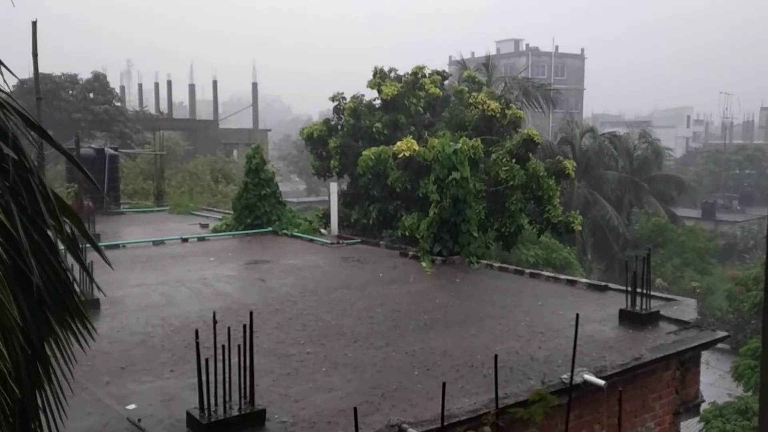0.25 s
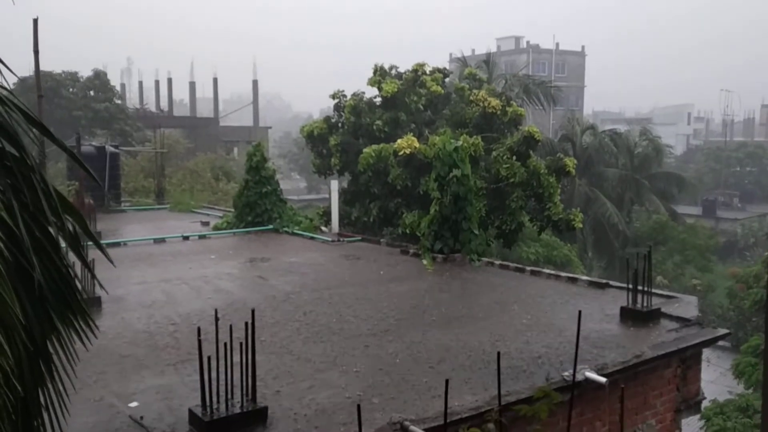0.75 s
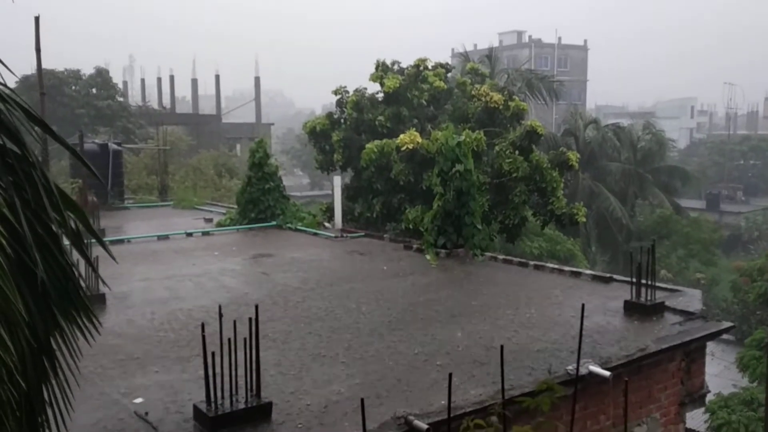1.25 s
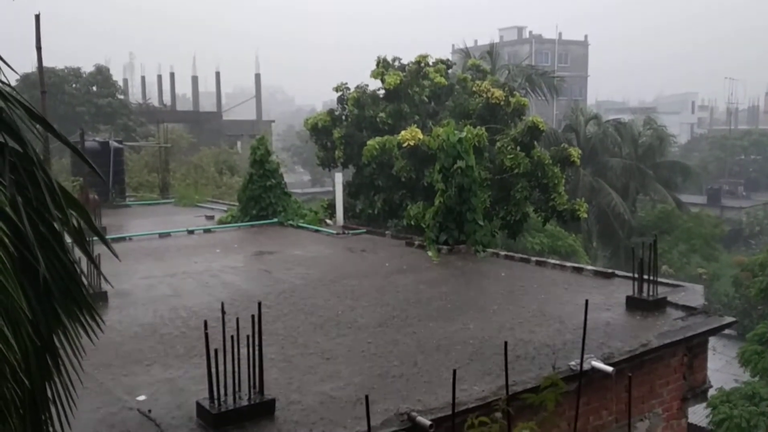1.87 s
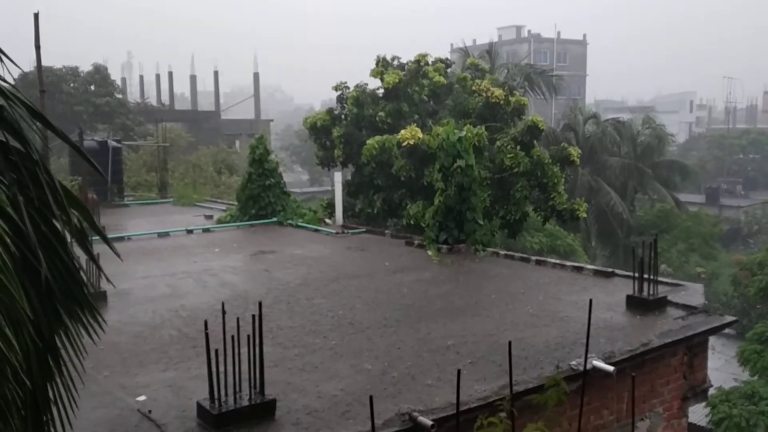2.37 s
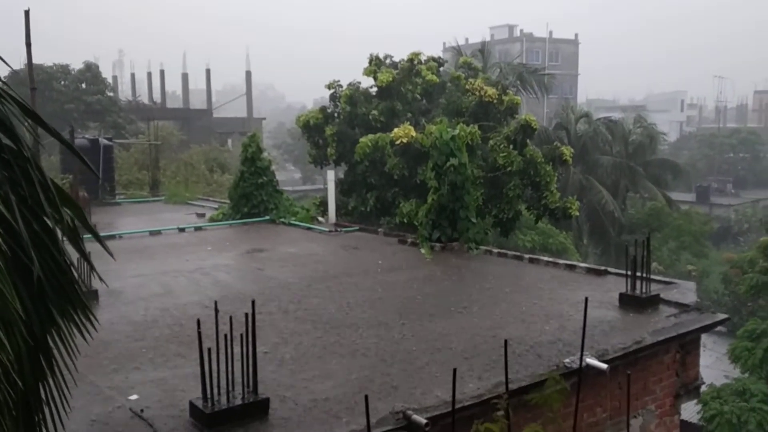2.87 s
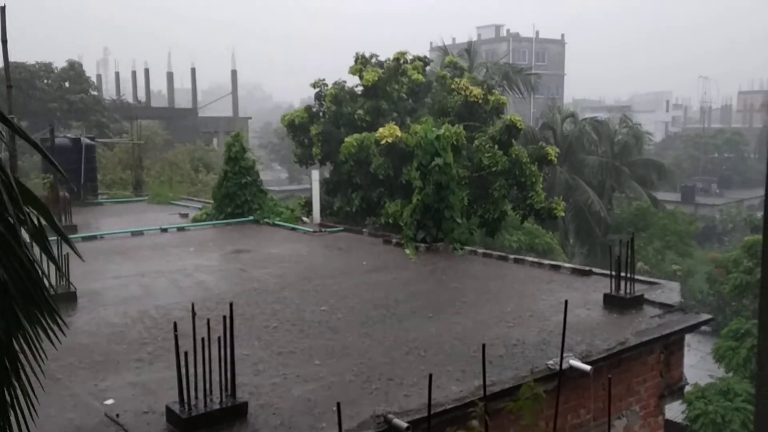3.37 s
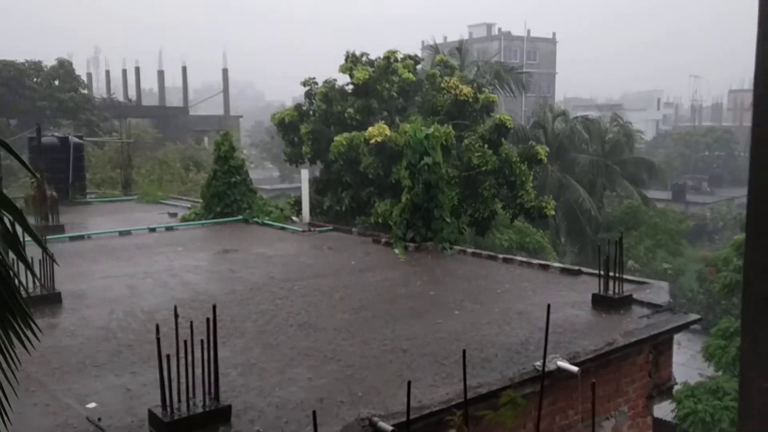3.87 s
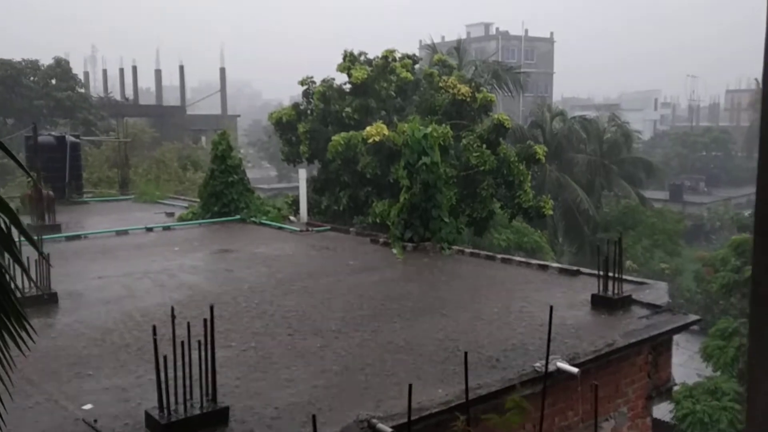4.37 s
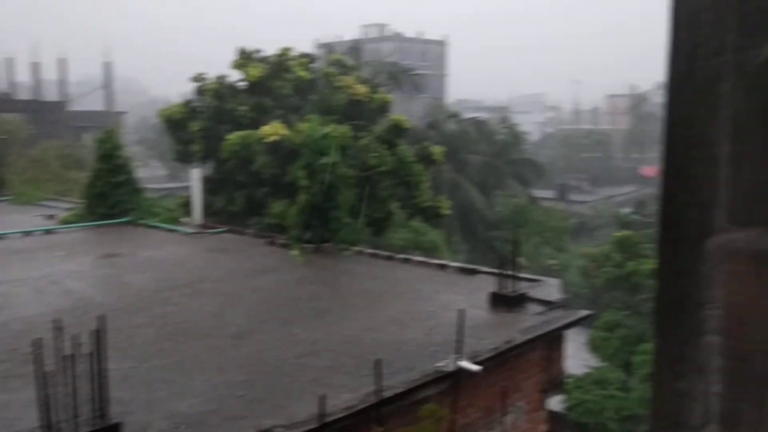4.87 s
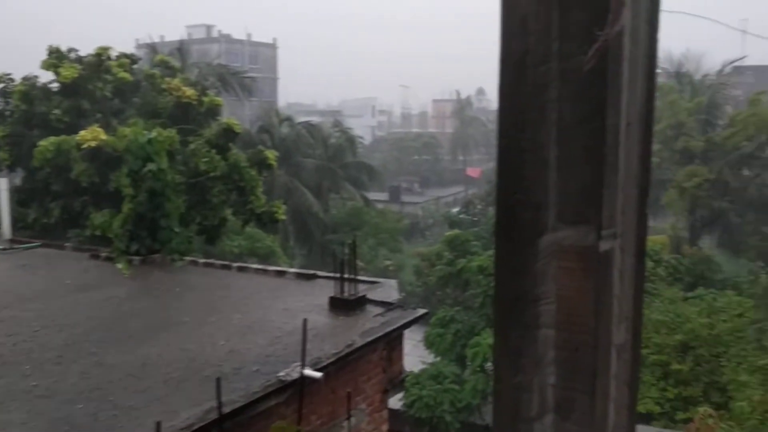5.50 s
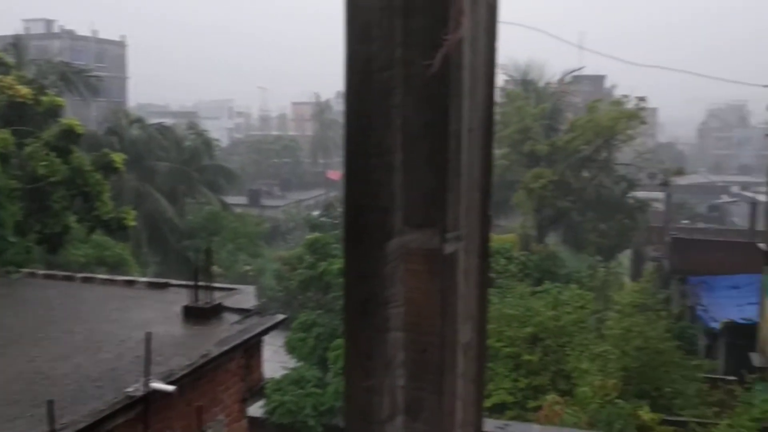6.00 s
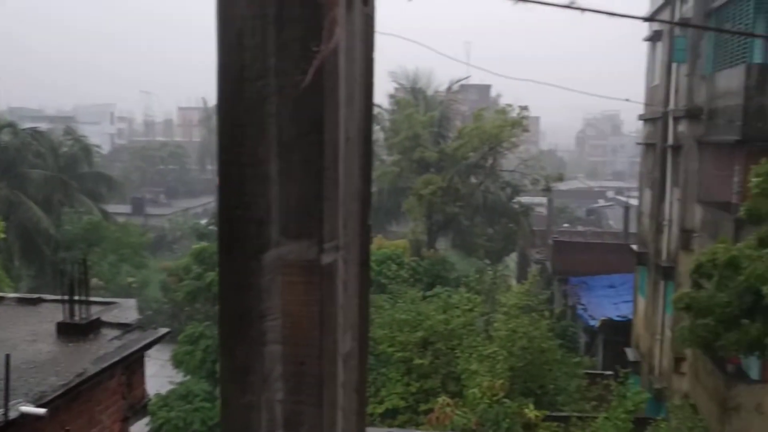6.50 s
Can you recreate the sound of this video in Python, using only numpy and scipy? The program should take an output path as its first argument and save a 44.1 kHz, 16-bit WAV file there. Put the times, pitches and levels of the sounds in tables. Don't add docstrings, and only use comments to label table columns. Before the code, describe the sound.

Outdoors beside a wet concrete roof and trees, heavy rain falls without a break: a wide, dense hiss with fine bright patter. Big drops splat close by, mostly to the left. From about two seconds, low wind gusts rumble and thump against the handheld stereo microphone, strongest from five seconds to the end.

```python
import sys
import numpy as np
from scipy import signal
from scipy.fft import rfft, irfft, next_fast_len
from scipy.io import wavfile
from scipy.ndimage import uniform_filter1d, map_coordinates

SR = 44100
rng = np.random.default_rng(int(sys.argv[2]) if len(sys.argv) > 2 else 0)


def transcribe(u):
    v = np.clip(np.atleast_2d(u).T, -1, 1)
    q = np.round(v * 32767).astype(np.int16)
    wavfile.write(sys.argv[1], SR, q)


def voltage_ratio(level):
    return 10 ** (np.asarray(level, float) / 20)


N = 297234

# (frequency [Hz], density [dB per Hz])
WASH_LEFT = [(30, -109), (60, -74), (130, -70.5), (330, -64.5), (800, -63.5), (2000, -63.5), (3400, -65.5),
             (6000, -64.5), (7300, -62.5), (8400, -63.5), (9300, -62), (10300, -62.5), (12700, -67.5),
             (15700, -64)]
WASH_RIGHT = [(30, -107), (60, -83), (130, -68), (330, -65), (800, -63.5), (2000, -62.5), (3400, -64),
              (6000, -62.5), (7300, -61), (8400, -62), (9300, -63.5), (10300, -67.5), (12700, -69.5),
              (15700, -75)]
# (frequency [Hz], change [dB])
TURN_LEFT = [(330, 0), (800, -0.2), (2000, 7), (3400, 3.5), (6000, 2), (7300, 6), (8400, 6), (9300, 3.2),
             (10300, 2.5), (12700, 6), (15700, -2)]
TURN_RIGHT = [(330, -0.7), (800, 1.1), (2000, 1.4), (3400, -0.5), (6000, 1), (7300, -0.9), (8400, 2.7),
              (9300, -3), (10300, -2), (12700, -2.5), (15700, -1)]
# (time [s], turn [0-1], rain strength [dB])
POSE = [
    (0, 0, 0.47),
    (2, 0.17, .5),
    (2.6, 0.33, 0.4),
    (2.9, 0.53, 0.6),
    (3.2, 0.92, 0),
    (4, 0.8, 0.5),
    (5, 0.96, 0.5),
    (6, 0.9, 0.5),
    (6.74, 0.78, 1.3),
]
# (frequency [Hz], gain [dB])
DROP_TONE = [(1500, -44), (4000, -8.5), (7000, -1.5), (10000, 0.5), (16000, -5)]
# (time [s], swell of the fizz [dB])
SHEETS = [(.3, 1.2), (.6, 1.2), (.9, .7), (1.2, 1.8), (1.42, .9), (1.6, 1), (2.1, 1), (3.03, -0.2),
          (3.8, 2.3), (4.08, 1.8), (4.9, .7), (5.3, .9), (5.9, 2), (6.1, 0.3)]
# (frequency [Hz], share of swell [0-1])
SHEET_TONE = [(2500, 0.065), (6000, 0.58)]
# (frequency [Hz], spread [dB])
PATCHES = [(1500, 0.034), (5000, 0.33), (12000, 0.54)]
# (time [s], peak [dB], left over right [dB], spray length [ms])
SPLATS = [(0.179, -15, 9, 4.4), (0.746, -21, 7, 9.8), (1.046, -16, 2, 10), (1.427, -20, 9, 15),
          (1.612, -22, 10, 4), (2.094, -22, 3, 8), (2.116, -21, 5, 8.1), (2.137, -20, 5, 4.4),
          (2.265, -17, 18, 4.4), (2.559, -25, 2, 11), (2.813, -19, 8, 15), (3.006, -18, 6, 9),
          (3.102, -32, -1, 11), (3.155, -27, 8, 9), (3.345, -22, 3, 9.3), (3.818, -16, 14, 6.6),
          (3.924, -15, 9, 4.6), (4.349, -26, 0, 6), (4.566, -21, 8, 8), (4.878, -26, 1, 4.4),
          (5.105, -22, 12, 8.9), (5.168, -26, 4, 8), (5.485, -25, -2, 9), (5.591, -17, 18, 4.8),
          (5.836, -13, 12, 6.3), (5.896, -26, 10, 4), (6.502, -21, 5, 6.7)]
# (start [s], length [s], level [dB])
GUSTS_LEFT = [
    (2.13, 0.18, -31),
    (2.47, 0.077, -41),
    (2.68, 0.046, -42),
    (3.15, .25, -43),
    (3.45, 0.63, -38.5),
    (4.27, 0.25, -39.5),
    (4.9, 0.21, -38),
    (5.17, .6, -34.5),
    (6.17, 0.48, -32.5),
]
GUSTS_RIGHT = [(2.08, .04, -47), (2.27, .26, -43), (3.09, .02, -45), (3.2, 0.4, -38), (3.75, 0.19, -45),
               (4.08, 0.45, -44), (4.52, 0.33, -42), (4.98, .05, -46), (5.38, .36, -33.5), (5.88, .14, -37),
               (6.17, .36, -35), (6.66, .1, -44)]
# (frequency [Hz], density [dB per Hz])
BUFFET = [(20, -24), (40, -14), (60, -5.5), (80, 0), (110, 2), (150, -2), (200, -9), (280, -8), (450, -15),
          (900, -37.5)]
# (time [s], peak [dB], port [0 left, 1 right], pitch [Hz])
EDDIES = [(2.154, -10, 0, 161), (2.239, -16, 0, 170), (2.285, -24, 1, 100), (3.216, -17, 1, 120),
          (3.515, -16, 1, 140), (3.653, -15, 0, 161), (3.832, -20, 0, 150), (4.327, -19, 0, 190),
          (4.567, -21, 1, 200), (4.983, -19, 0, 205), (5.018, -21, 0, 130), (5.216, -18, 1, 150),
          (5.355, -12, 0, 140), (5.358, -17, 1, 130), (5.477, -26, 1, 160), (5.516, -17, 0, 130),
          (5.548, -11.5, 1, 150), (5.611, -21, 1, 130), (5.645, -20, 1, 160), (5.682, -21, 0, 119),
          (5.761, -19, 1, 120), (6.167, -15, 1, 108), (6.259, -15, 1, 182), (6.298, -12, 1, 220),
          (6.313, -18, 0, 150), (6.343, -19, 0, 140), (6.435, -14, 1, 170), (6.495, -14, 0, 130),
          (6.588, -18, 0, 150), (6.636, -16, 0, 129.5)]
# (frequency [Hz], width [Hz], lift [dB])
PORT_MODES = [
    (793, 155, 2.9),
    (2480, 800, 0.3),
    (7150, 620, 1.54),
    (8480, 110, 1.5),
    (10800, 300, 1.7),
    (12300, 600, 1.5),
]
# (frequency [Hz], threshold over masking level [dB])
SQUELCH = [(1800, -20.5), (2800, -1), (4500, 0.5), (6200, -0.5), (7500, 1), (9200, -1), (11000, -1.5),
           (13000, -3), (15700, 2.5)]

PORTS_M, SOUND_MS = 0.15, 355
FRAME = 512
SHEET_S, FLICKER_DB = 0.066, 0.12
GUST_RISE_S, GUST_FALL_S = 0.03, 0.05
BREEZE_S, BREEZE_DB = 1.9, -53
UNEVEN_DB, MAKE_UP = 2, 0.5


def unit(x):
    return x / np.sqrt(np.mean(x ** 2, axis=-1, keepdims=True) + 1e-20)


def along(points, hz):
    f, v = np.transpose(points)
    return np.interp(np.log(hz + 1), np.log(f + 1), v)


def wobble(rate):
    knots = rng.standard_normal((2, 1000))
    return np.array([map_coordinates(k, [np.arange(N) * rate / SR]) for k in knots])


def filtered(x, response):
    m = next_fast_len(N + SR // 2)
    return irfft(rfft(x, m) * response(np.fft.rfftfreq(m, 1 / SR)), m)[..., :N]


def smoothed(x, bands, frames):
    return uniform_filter1d(uniform_filter1d(x, size=bands, axis=1), size=frames, axis=2)


def rain():
    field = diffuse_wash() + voltage_ratio(-7.5) * patter(count=5000, spread_db=1.0)
    hz, t, z = signal.stft(field, SR, nperseg=FRAME)
    pose_s, turns, strengths_db = np.transpose(POSE)
    turn = np.interp(t, pose_s, turns)
    strength_db = np.interp(t, pose_s, strengths_db)
    wash_db = np.array([along(WASH_LEFT, hz), along(WASH_RIGHT, hz)])[..., None]
    turn_db = np.array([along(TURN_LEFT, hz), along(TURN_RIGHT, hz)])[..., None]
    patches = smoothed(rng.standard_normal(z.shape), bands=40, frames=8)
    patchy_db = along(PATCHES, hz)[:, None] * patches / patches.std()
    sheet_db = along(SHEET_TONE, hz)[:, None] * sheets(t)
    level_db = wash_db + turn * turn_db + strength_db + sheet_db + patchy_db - 0.7
    gain = voltage_ratio(level_db) * np.sqrt(SR / 2)
    return signal.istft(z * gain, SR, nperseg=FRAME)[1][:, :N]


def diffuse_wash():
    def angle(hz):
        return np.arccos(np.sinc(2 * hz * PORTS_M / SOUND_MS)) / 2

    def lag(hz):
        return np.exp(2j * np.pi * hz * 0.00006 * np.array([[-1], [1]]))

    noise = rng.standard_normal((2, N))
    mid, side = filtered(noise, lambda hz: np.array([np.cos(angle(hz)), np.sin(angle(hz))]))
    return filtered(np.array([mid + side, mid - side]), lag)


def patter(count, spread_db):
    when, size, side, sign = rng.random((count, 4)).T
    gain = voltage_ratio(-spread_db * np.log(1 - size * 0.98)) * np.sign(sign - 0.5)
    at = (when * N).astype(int)
    shares = np.cos(side * np.pi / 2), np.sin(side * np.pi / 2)
    ticks = [np.bincount(at, gain * share, N) for share in shares]
    age_s = np.arange(90) / SR
    burst = rng.standard_normal(90) * voltage_ratio(-60 * age_s / 0.00089)
    drops = signal.fftconvolve(ticks, [burst], axes=1)[:, :N]
    return filtered(unit(drops), lambda hz: voltage_ratio(along(DROP_TONE, hz)))


def sheets(t):
    swell_db = sum(db * np.exp(-((t - s) / SHEET_S) ** 2) for s, db in SHEETS)
    flicker = np.interp(t, np.arange(N) / SR, wobble(4.8)[0])
    return swell_db - swell_db.mean() + FLICKER_DB * flicker


def splats():
    out = np.zeros((2, N + SR))
    t = np.arange(1400) / SR
    for s, db, lean_db, length_ms in SPLATS:
        ports_db = np.array([[db + min(lean_db, 0)], [db - max(lean_db, 0)]])
        droplets_db = 1.6 * rng.standard_normal(len(t) // 35).repeat(35)
        spray = rng.standard_normal((2, len(t))) * voltage_ratio(droplets_db)
        attack = 1 - np.exp(-t / 0.0005)
        shape = attack / (1 + (1000 * t / length_ms) ** 4)
        start = round((s - 0.002) * SR)
        out[:, start:start + len(t)] += voltage_ratio(ports_db + 2) * unit(spray) * shape
    return filtered(out[:, :N], lambda hz: voltage_ratio(along(DROP_TONE, hz)))


def wind():
    t = np.arange(N) / SR
    lumps_db = 1.55 * wobble(18) + 1.9 * wobble(9.8)
    rumble = filtered(rng.standard_normal((2, N)), lambda hz: voltage_ratio(along(BUFFET, hz)))
    levels = np.array([gusts(GUSTS_LEFT, t), gusts(GUSTS_RIGHT, t)])
    return levels * unit(voltage_ratio(lumps_db) * rumble) + eddies()


def gusts(rows, t):
    def edge(late_s, tau_s):
        return np.exp(-np.clip(late_s, 0, None) / tau_s)

    level = voltage_ratio(BREEZE_DB) * (t > BREEZE_S)
    for s, length_s, db in rows:
        level = level + voltage_ratio(db) * edge(s - t, GUST_RISE_S) * edge(t - s - length_s, GUST_FALL_S)
    return level


def eddies():
    out = np.zeros((2, N))
    u = np.arange(-1500, 1500) / SR
    for s, db, port, pitch_hz in EDDIES:
        phase = 2 * np.pi * rng.random()
        swell = np.exp(-0.5 * (u * pitch_hz / 0.45) ** 2)
        thump = swell * np.cos(2 * np.pi * pitch_hz * u + phase)
        out[round(port), round(s * SR) - 1500:][:len(u)] += voltage_ratio(db - 5.0) * thump
    return out


def scene():
    return rain() + splats() + wind()


def port_response(hz):
    lift_db = sum(db * np.exp(-((hz - centre_hz) / width_hz) ** 2) for centre_hz, width_hz, db in PORT_MODES)
    return voltage_ratio(lift_db) / np.sqrt(1 + (55 / (hz + 1)) ** 4.5)


def squelch(x):
    def spread(v, bands=60):
        return abs(smoothed(abs(v) ** 2, bands, frames=7)) + 1e-20

    lead = 704
    pair = np.pad([x[0] + x[1], x[0] - x[1]], ((0, 0), (lead, 0)))
    hz, _, z = signal.stft(pair, SR, window="cosine", nperseg=2048)
    uneven = unit(smoothed(rng.standard_normal(z.shape), bands=10, frames=2))
    threshold_db = along(SQUELCH, hz)[:, None] + UNEVEN_DB * uneven
    kept = z * (abs(z) > np.sqrt(spread(z, bands=130)) * voltage_ratio(threshold_db))
    kept = kept * (spread(z) / spread(kept)) ** (MAKE_UP / 2)
    back = signal.istft(kept, SR, window="cosine", nperseg=2048)[1]
    both, apart = back[:, lead:lead + N] / 2
    return np.array([both + apart, both - apart])


def roll_off(x):
    return signal.sosfilt(signal.butter(12, 15750, fs=SR, output="sos"), x)


def record(dry):
    mix = squelch(filtered(dry, port_response))
    return roll_off(mix)


dry = scene()
out = record(dry)
transcribe(out)
```